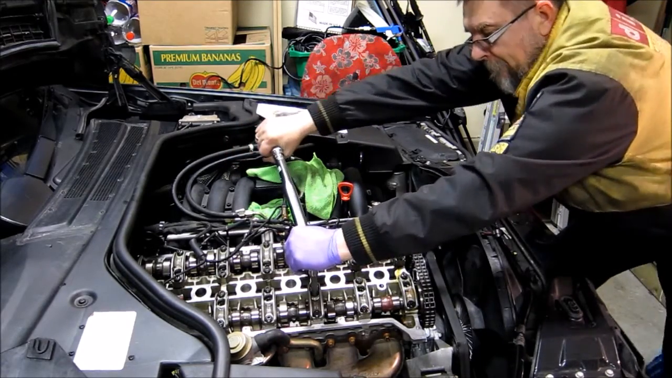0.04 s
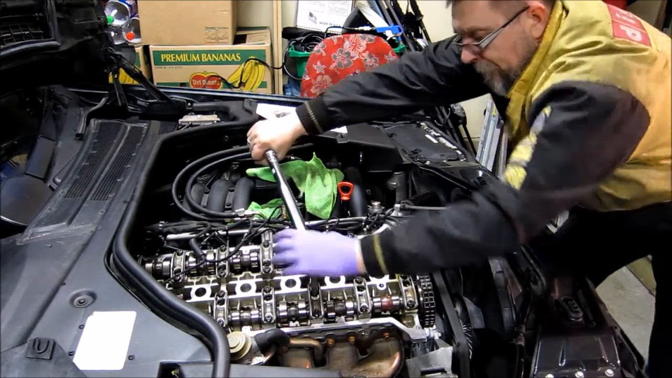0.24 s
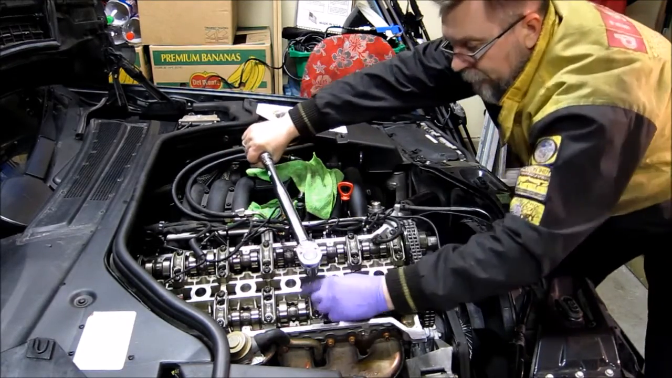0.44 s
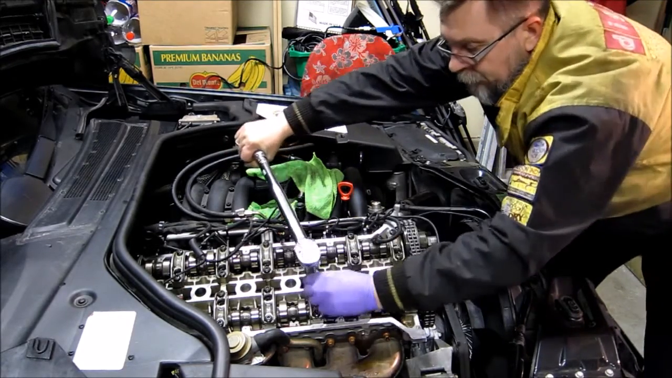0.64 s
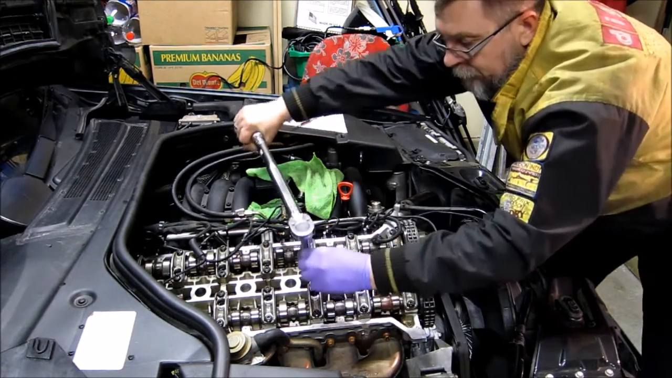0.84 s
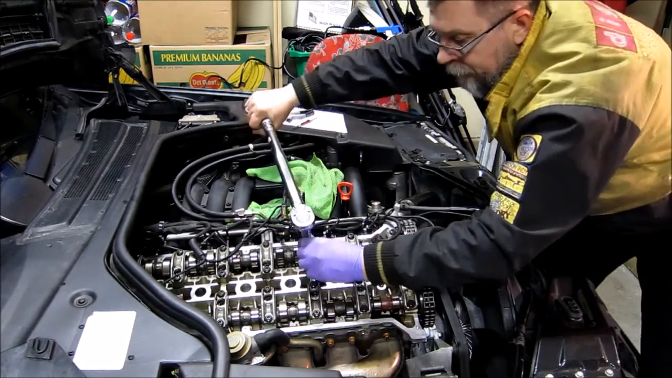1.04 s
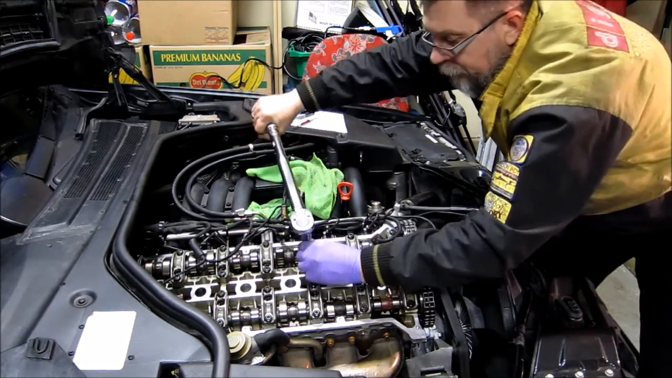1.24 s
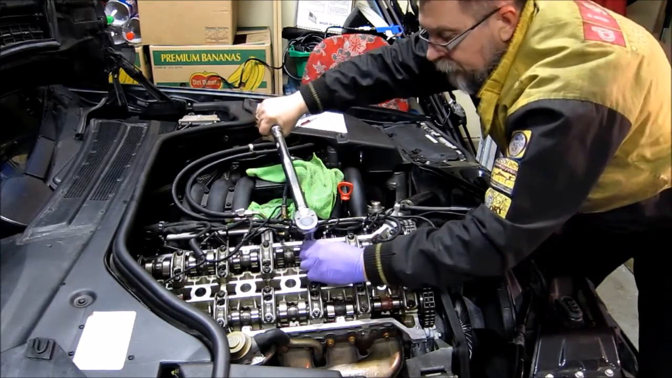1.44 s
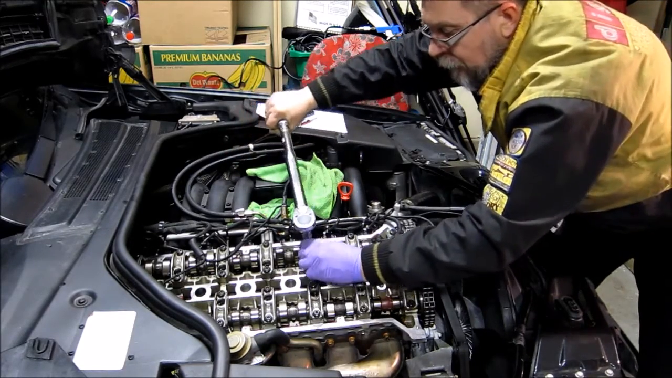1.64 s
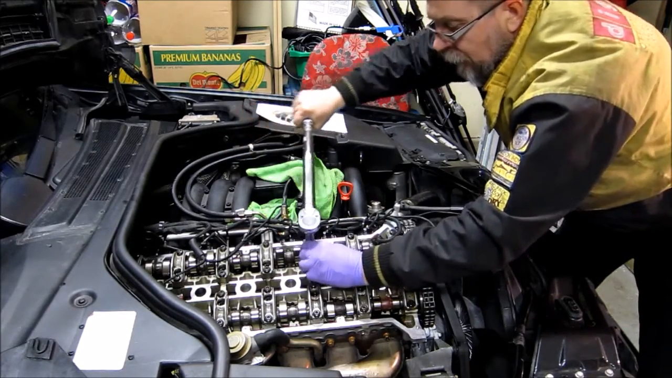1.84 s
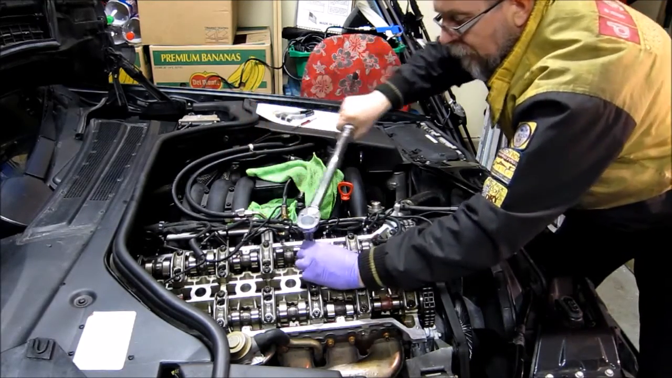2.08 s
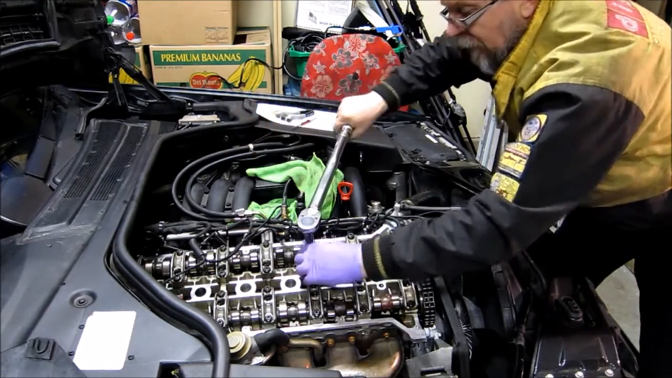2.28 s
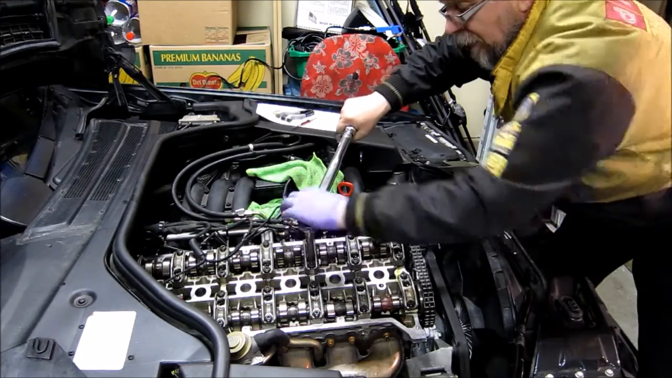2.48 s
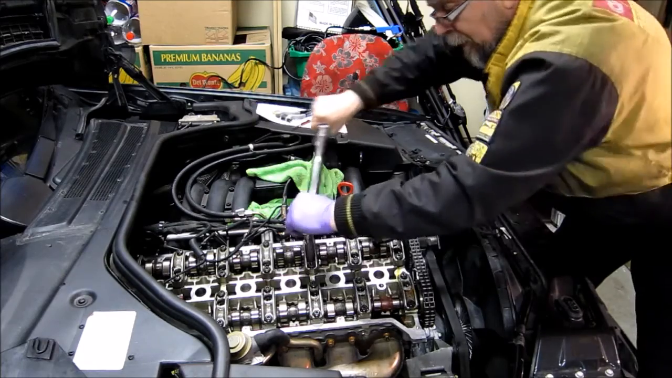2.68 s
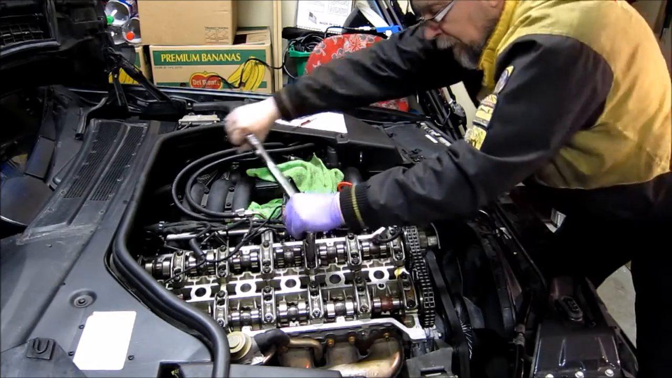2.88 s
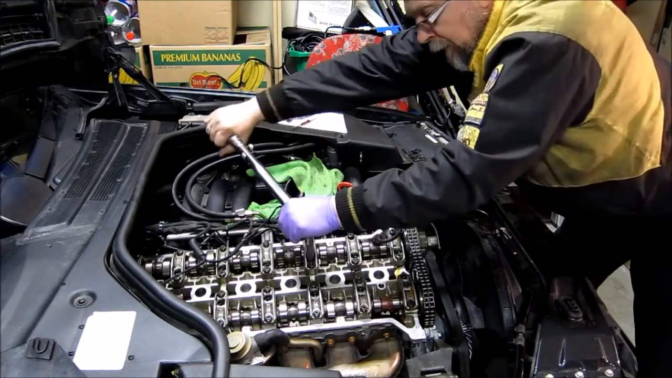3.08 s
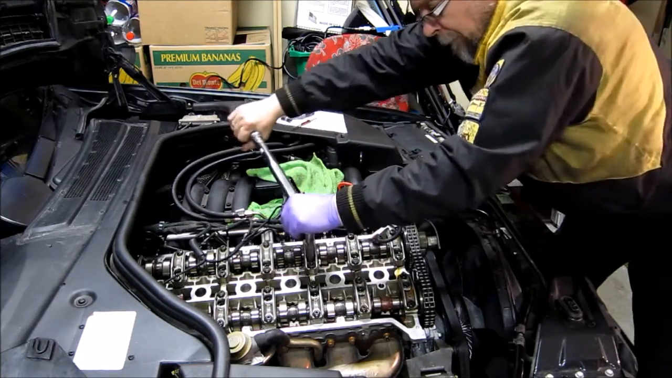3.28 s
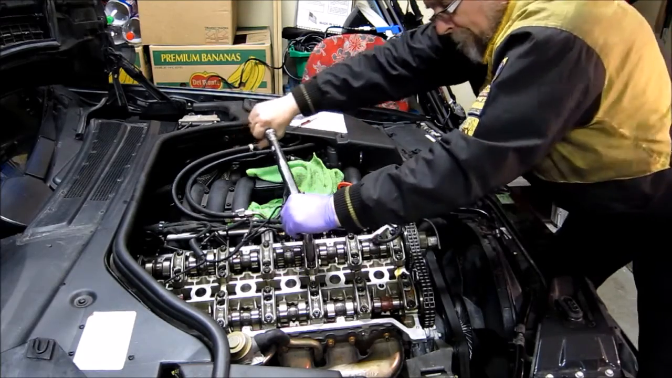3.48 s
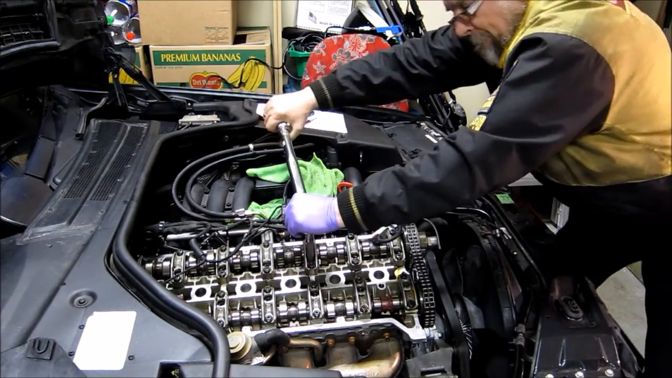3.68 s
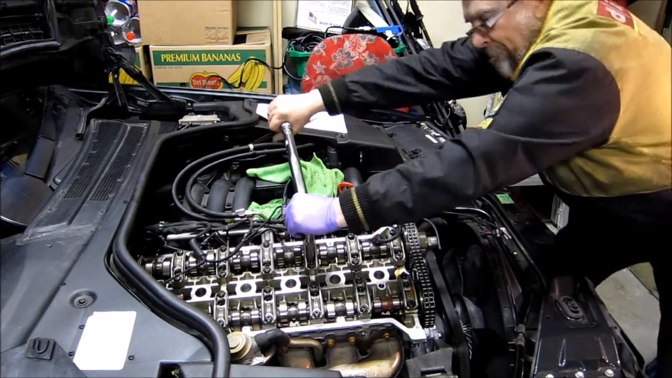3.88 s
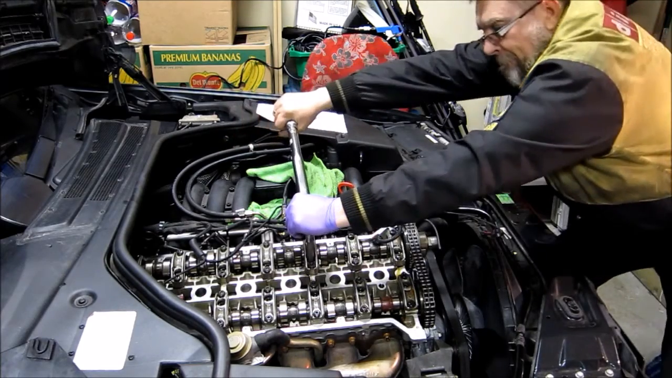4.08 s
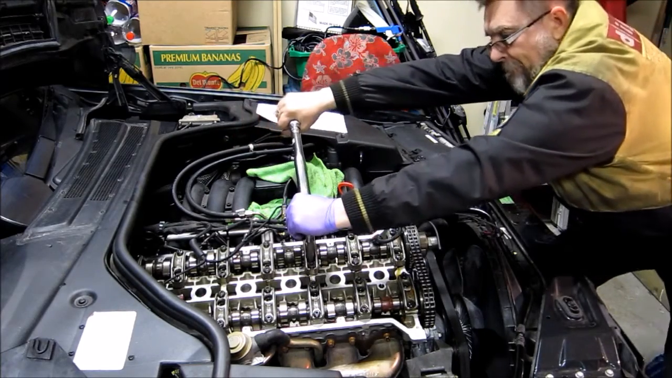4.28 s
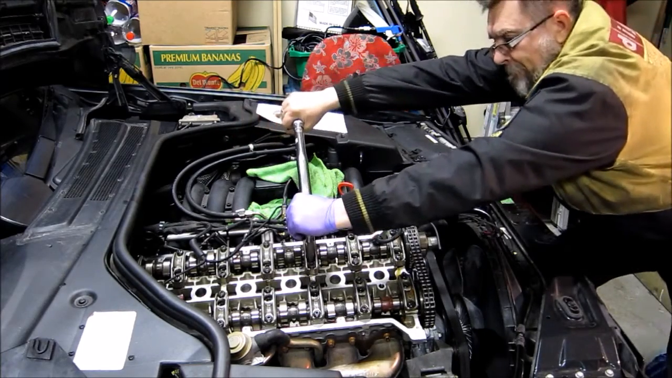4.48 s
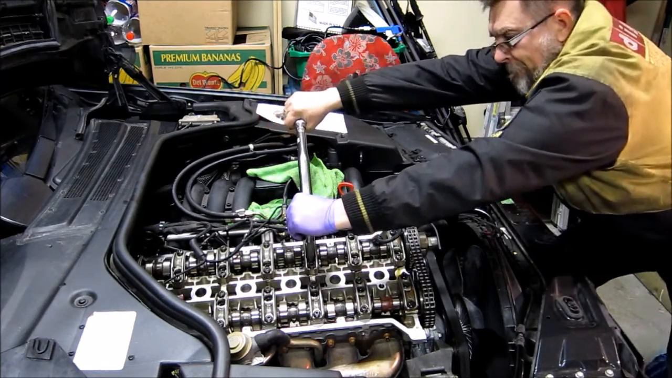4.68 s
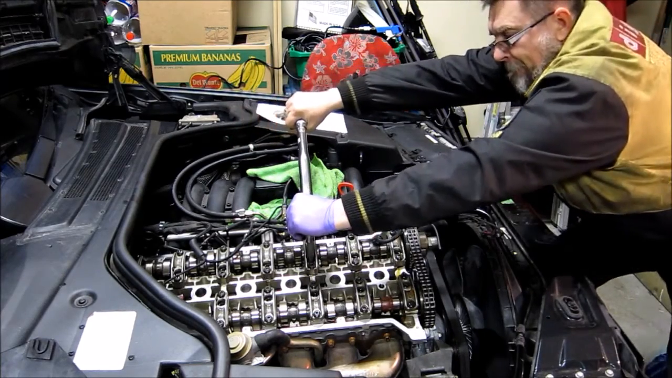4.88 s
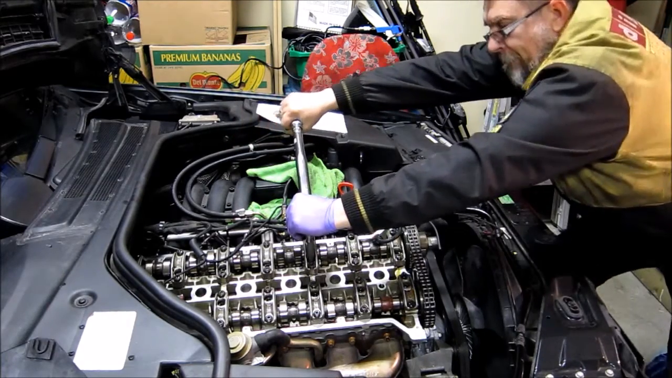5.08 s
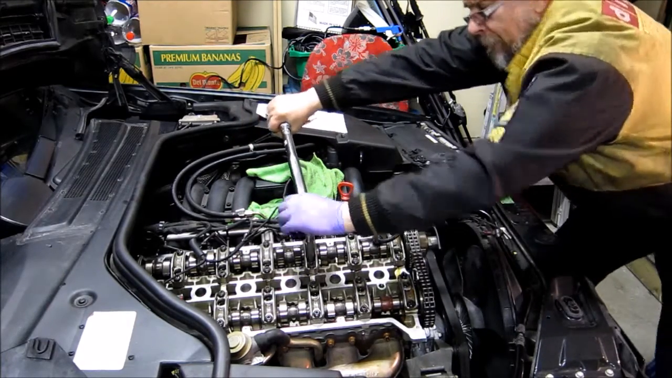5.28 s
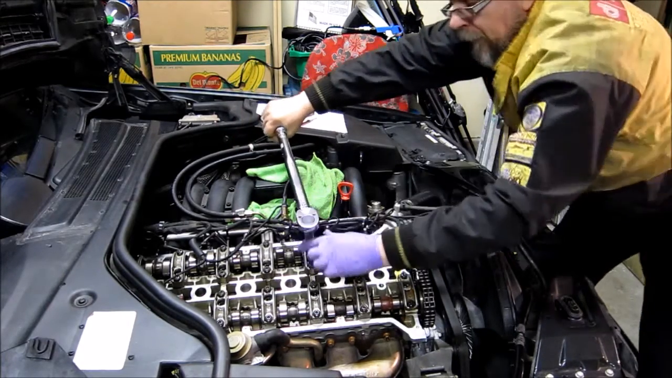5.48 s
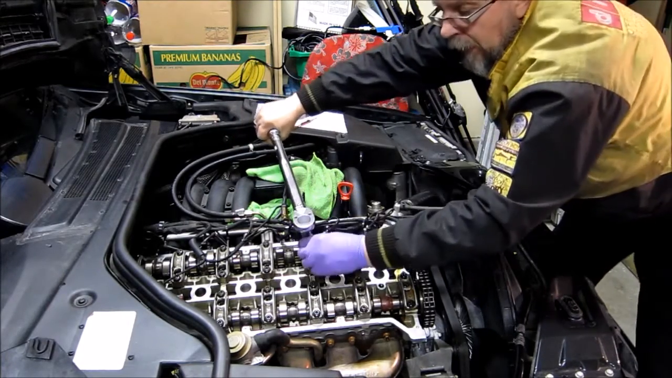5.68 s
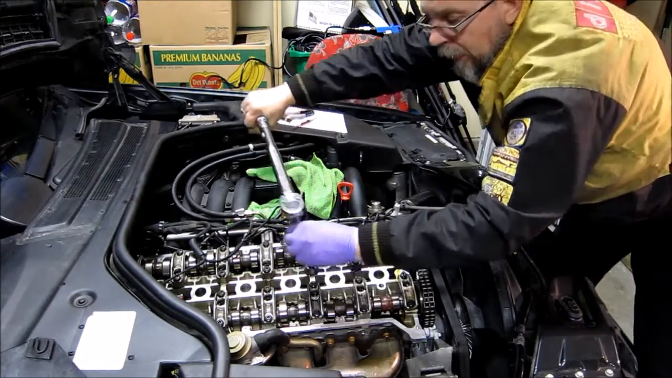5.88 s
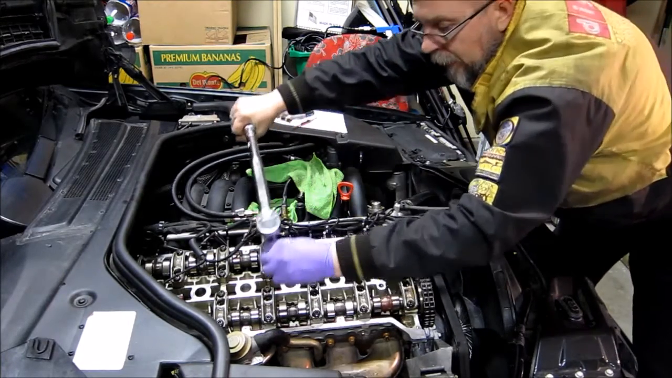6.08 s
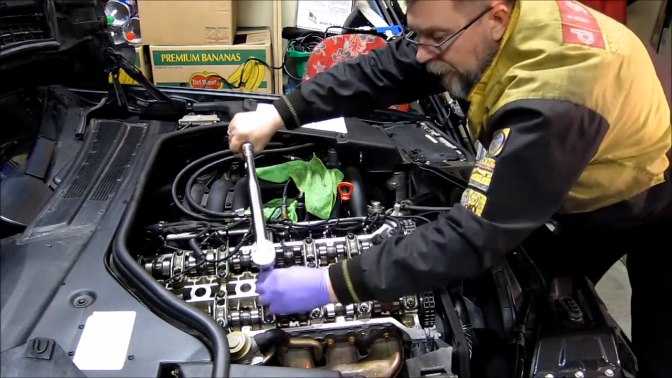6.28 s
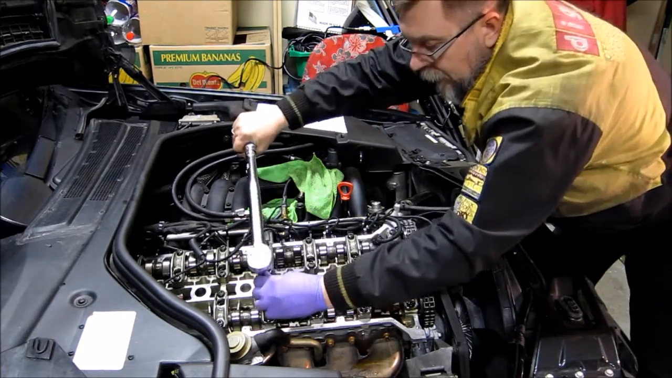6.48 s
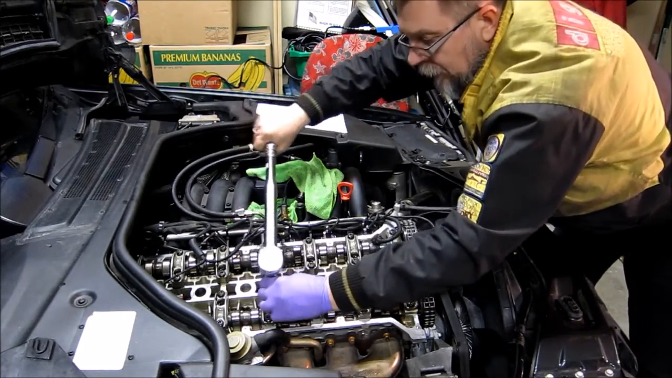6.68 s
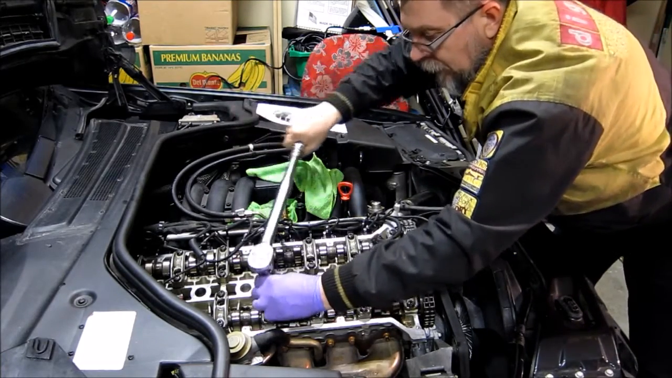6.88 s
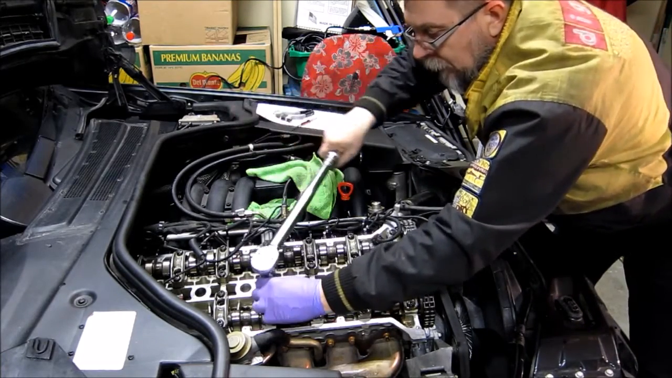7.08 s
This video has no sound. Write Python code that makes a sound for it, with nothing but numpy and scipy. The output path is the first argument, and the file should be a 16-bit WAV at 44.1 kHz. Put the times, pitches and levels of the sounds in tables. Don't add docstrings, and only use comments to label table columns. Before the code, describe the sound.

A small garage is heard from two metres, with a wavering machine hum, rushing air and low traffic rumble, initially subdued and swelling back. At 0.1 s a torque wrench snaps, hard and thin, with a brief steel ring. From 0.35 to 1.2 s the socket drags over metal, a gritty scrape growing firmer and squealing, with small ticks, ending in a firm clack at 1.2. Rattlier seating knocks come at 1.6 and 2.0, then sleeve rustles and ticks. Two snaps fall close together at 2.8 and 2.9. A quieter gap carries soft cloth rubbing and rumble swells around 3 to 4.5. The hardest, brightest snap cracks at 4.7, ringing; the background drops sharply and creeps back. Another snap follows at 5.2. Faint sliding and light ticks come at 5.6-5.9, then socket clacks at 6.4, 6.65 and 7.05, with short garage echo.

```python
import sys
import numpy as np
from scipy import signal
from scipy.fft import rfft, irfft
from scipy.io import wavfile
from scipy.ndimage import uniform_filter1d

SR = 44100
rng = np.random.default_rng(int(sys.argv[2]) if len(sys.argv) > 2 else 0)


def generate_wav(sig):
    pcm = np.round(np.clip(np.atleast_2d(sig).T, -1, 1) * 32767).astype(np.int16)
    wavfile.write(sys.argv[1], SR, pcm)


def amplitude_ratio(level_db):
    exponent = np.asarray(level_db, float) / 20
    return 10 ** exponent


N = 314874
KNOCK_SAMPLES, LEAD_SAMPLES = 4096, 256


def wrench(gain_db):
    out = np.zeros((2, N + SR))
    for start_s, level_db, *colour in knocks():
        i = int(start_s * SR) - 24
        first = i - LEAD_SAMPLES
        out[:, first:first + KNOCK_SAMPLES] += amplitude_ratio(level_db + 12 - gain_db[i]) * knock(*colour)
    ring_to_room_db = np.array([[0], [-5]])
    for start_s, pitch_hz, level_db, t60_s in rings():
        i = int(start_s * SR)
        ring = beating_ring(pitch_hz, t60_s)
        out[:, i:i + len(ring)] += amplitude_ratio(level_db - 5 - gain_db[i] + ring_to_room_db) * ring
    return out[:, :N]


# start_s, peak_db, upper_db (4.5-8 kHz), treble_db, rattle_ms
SNAPS = [
    (0.1129, -6.5, 1.5, -3, 1.27),
    (2.8248, -7.5, -4, -9, 1.96),
    (2.9193, -9.5, -13, -4, 2),
    (4.7176, -4.5, 5.5, 0, 0.75),
    (5.2108, -6.5, 2.5, -2, 0.85),
]
# start_s, peak_db, upper_db, treble_db, rattle_ms
SEATS = [
    (1.2148, -6, 1, -2, 1.54),
    (1.5838, -13.5, -1.5, -11, 3.2),
    (1.9903, -13.5, 6.5, 0, 1.05),
    (2.0026, -10, -3.5, -0.5, 1.9),
    (6.3618, -7.5, 4, -3.5, 1.36),
    (6.6468, -10, -3.5, -3.5, 2.1),
    (7.0608, -10, 5, -10.5, 0.57),
]
# start_s, peak_db, brightness_db, bass_db
TICKS = [(0.6565, -32, -4.5, -18), (0.788, -34.5, 3, -13), (1.6572, -25.5, -18.5, -17),
         (1.7567, -33.5, -3, -12), (1.7674, -39, -3, -14), (2.3519, -34.5, -11, -27),
         (2.5544, -32.5, -2, -3.5), (2.569, -36, 3.5, -16), (2.6854, -54.5, 16.5, -3),
         (2.7298, -40.5, -1.5, -14), (2.7714, -44.5, 5, -15), (3.7048, -40, -10.5, -2),
         (5.7949, -38.5, -1.5, -9), (5.8114, -34.5, -17, -20), (5.8462, -33, -15, -21),
         (5.861, -27, -9.5, -21.5), (5.8768, -35.5, -10.5, -5.5), (6.4782, -25, -9.5, -31.5),
         (6.819, -43, -24.5, -18), (6.994, -57, -22, -12)]
# start_s, peak_db, upper_db, treble_db, bass_db
TOUCHES = [(1.579, -18.5, -23, -0.5, -22), (1.982, -30, -6, -15.5, -27), (1.987, -22, -31, -27, -13),
           (2.008, -13, -7, -17, -12.5), (2.823, -24.5, 9, 7, -43), (2.913, -22.5, 11, -10, -39),
           (5.52, -63, 5.5, 1.5, -19), (5.802, -38.5, -5, -0.5, -23.5), (5.852, -37, -1, -15.5, -21),
           (6.345, -38, -7, -17, -14), (6.596, -42, -7, -19.5, -25), (6.619, -50.5, -15.5, -37.5, -10),
           (7.054, -20.5, 3, -7.5, -41), (7.069, -16.5, -23, -9, -22.5)]
SNAP_BASS_DB, SEAT_BASS_DB = -33, -23
TICK_TREBLE_DB, TICK_RATTLE_MS = -6, 2.6
TOUCH_RATTLE_MS = 3.3


def knocks():
    rows = []
    for table, bass_db in ((SNAPS, SNAP_BASS_DB), (SEATS, SEAT_BASS_DB)):
        rows += [(*row[:4], bass_db, row[4]) for row in table]
    for start_s, peak_db, bright_db, bass_db in TICKS:
        rows.append((start_s, peak_db, bright_db, bright_db + TICK_TREBLE_DB, bass_db, TICK_RATTLE_MS))
    rows += [(*row, TOUCH_RATTLE_MS) for row in TOUCHES]
    return sorted(rows)


# pitch_hz, level_db, t60_s
STEEL_MODES = [(1193, -10, 0.2), (1643, -5, 0.11), (2050, -20.5, 0.026), (2360, -17.5, 0.1),
               (2650, -5, 0.22), (3316, 5.5, 0.069), (3510, -7, 0.035), (4330, 0, 0.12), (4680, -3, 0.14),
               (5200, -16.5, 0.033), (5050, -16.5, 0.067), (6100, -10, 0.079), (6850, -8, 0.029),
               (10300, -16.5, .03), (9850, -0.5, 0.022), (12400, -2.5, 0.015), (10600, -10.5, 0.022),
               (12600, -16, 0.017)]
# frequency_hz, level_db
CRACK = [(60, -30), (250, -17), (700, -2), (1200, -9), (1700, -6.5), (2500, -0.5), (4000, -0.5), (5500, -4),
         (7500, -2.5), (10500, 2), (13000, -9), (15500, -14.5), (17500, -58)]
BAND_EDGES_HZ = (1150, 4500, 8200)


def knock(upper_db, treble_db, bass_db, rattle_ms):
    t = np.arange(KNOCK_SAMPLES) / SR
    hz = np.fft.rfftfreq(KNOCK_SAMPLES, 1 / SR)
    since = np.maximum(t - LEAD_SAMPLES / SR, 0)
    contacts = rng.standard_normal(KNOCK_SAMPLES) * amplitude_ratio(4 * rng.standard_normal(KNOCK_SAMPLES))
    rattle = (1 - np.exp(-since / 0.0017)) ** 2 * np.exp(-1000 * since / max(rattle_ms, 0.3))
    contacts = rfft(contacts * rattle)

    strike, shift = rng.standard_normal((2, len(STEEL_MODES), 1))
    mode_hz, mode_db, t60_s = np.transpose(STEEL_MODES)[:, :, None]
    ringing = amplitude_ratio(mode_db + 3 * strike) * fading(t, mode_hz * (1 + 0.02 * shift), t60_s)
    modes = rfft(np.sum(ringing, axis=0))
    crack = amplitude_ratio(along_hz(CRACK, hz))
    steel_db = -11
    body = crack + amplitude_ratio(steel_db) * modes * np.linalg.norm(crack) / np.linalg.norm(modes)

    power = np.abs(contacts) ** 2
    front = contacts / np.sqrt(uniform_filter1d(power, size=48))
    around = contacts / np.sqrt(uniform_filter1d(power, size=8))

    lowpasses = [1 / (1 + (hz / edge) ** 8) for edge in BAND_EDGES_HZ]
    bands = np.diff([0 * hz, *lowpasses, 1 + 0 * hz], axis=0)
    levels_db = (bass_db + 3.5, 0, upper_db, treble_db)
    weights = sum(amplitude_ratio(db) * b / np.linalg.norm(b * crack) for db, b in zip(levels_db, bands))
    both = irfft(np.array([front * body, around * crack]) * weights)
    onset = 1 - np.exp(-since / 0.0006)
    return both * onset * signal.windows.tukey(KNOCK_SAMPLES, 0.1) * np.sqrt(KNOCK_SAMPLES / 2)


# start_s, pitch_hz, level_db, t60_s
SHAFT_RINGS = [(0.115, 6090, -53, 0.62), (1.215, 2820, -32, 0.18), (1.216, 2240, -34.5, 0.36),
               (1.217, 4130, -45.5, 0.5), (4.718, 4160, -30, 0.27), (4.718, 2236, -24.5, 0.1),
               (4.718, 6080, -52, 0.81), (5.210, 1723, -42, 0.25), (5.211, 2251, -32, 0.32),
               (5.797, 3330, -46.5, 0.13), (6.647, 2842, -24, 0.099)]
# start_s, pitch_hz, level_db
PINGS = [(.114, 2400, -14), (.657, 6770, -37.5), (1.584, 5200, -24), (1.988, 3364, -17), (1.990, 6850, -13),
         (2.003, 10800, -20), (2.005, 4050, -13), (2.353, 2950, -40), (2.825, 2750, -19),
         (2.919, 5220, -14), (4.717, 6690, -6), (5.210, 2255, -19), (6.362, 3565, -15), (6.365, 2930, -17),
         (6.481, 4200, -35), (6.481, 2810, -35), (6.618, 2570, -35), (6.647, 10600, -24),
         (6.820, 2710, -43), (7.060, 6600, -14), (7.061, 11500, -15), (7.070, 10600, -22)]
PING_T60_S = 0.027
# pitch_hz, t60_s
HEAD_MODES = [(315, .12), (720, 0.083)]
# start_s, low_mode_db, high_mode_db
THUDS = [
    (.114, -48, -45),
    (4.718, -40, -50),
    (5.21, -46, -43),
    (6.362, -50, -35),
]


def rings():
    rows = SHAFT_RINGS + [(*row, PING_T60_S) for row in PINGS]
    for start_s, *levels_db in THUDS:
        rows += [(start_s, hz, db, t60_s) for db, (hz, t60_s) in zip(levels_db, HEAD_MODES)]
    return rows


def beating_ring(pitch_hz, t60_s):
    t = np.arange(int(min(t60_s, 1) * SR)) / SR
    splits = rng.standard_normal((6, 1))
    spread_hz = 0.007 * pitch_hz + 6 / t60_s
    modes = fading(t, pitch_hz + spread_hz * (splits - splits.mean()), t60_s)
    return np.sum(modes, axis=0) * (1 - np.exp(-t / 0.0006))


# centre_hz, width_hz, level_db
SCRAPE_BODY = [(332, 42, -2.5), (1302, 62, 3), (1530, 85, -11), (1670, 160, 8), (1770, 97, 2),
               (2160, 76, -2), (2420, 57, -27), (2905, 68, -21), (3135, 300, -21)]
SQUEAL_HZ, SQUEAL_WIDTH_HZ = 2740, 58
FIRM_DB = -45
SQUEAL_DB, SQUEAL_GROWTH = -7, 2.36
BRIGHT_DB, BRIGHT_GROWTH = -9.5, -1.4


def scrape(gain_db):
    unrest_db = np.array([1.5 * walk(60), 3.2 * walk(70), 1.5 * walk(30), 2.5 * walk(60)])
    slips = rng.standard_normal((4, N)) * amplitude_ratio(unrest_db)
    body = 0
    for hz, width_hz, level_db in SCRAPE_BODY:
        body = body + amplitude_ratio(level_db + 1.2 * walk(12)) * band(hz, width_hz, slips[0])
    press = pressure_db() - FIRM_DB
    squeal = amplitude_ratio(SQUEAL_DB + SQUEAL_GROWTH * press) * band(SQUEAL_HZ, SQUEAL_WIDTH_HZ, slips[1])
    bright = amplitude_ratio(BRIGHT_DB + BRIGHT_GROWTH * np.maximum(press, -8))
    bright = bright * band(3900, 700, band(4600, 1200, slips[2]))
    cloth = strokes() * band(3600, 4500, band(4000, 6200, slips[3]))
    steel = amplitude_ratio(FIRM_DB + press) * (rms1(body) + squeal + bright)
    return amplitude_ratio(-7 - gain_db) * (steel + cloth)


# time_s, pressure_db
SCRAPE = [
    (0.33, -76),
    (0.36, -50.5),
    (0.53, -51.5),
    (0.572, -55),
    (0.6, -46.5),
    (0.778, -44.5),
    (0.918, -41.5),
    (1.184, -42),
    (1.21, -48),
]
# time_s, pressure_db
SLIDE = [
    (5.555, -72),
    (5.572, -61.5),
    (5.64, -72),
    (5.79, -66.5),
    (5.8, -70),
]


def pressure_db():
    t = np.arange(N) / SR
    heavy, light = (np.interp(t, *np.transpose(rows), -120, -120) for rows in (SCRAPE, SLIDE))
    return np.maximum(heavy, light)


# start_s, length_s, level_db
RUSTLE = [(1.38, 0.51, -54.5), (2.15, .19, -49), (2.38, .1, -54.5), (2.555, .04, -46), (2.693, 0.035, -45),
          (2.74, .07, -53.5), (3.7, .32, -54.5), (4.04, .03, -52), (4.15, .3, -63.5), (4.557, .012, -59),
          (5.563, .012, -65)]
STROKE_ATTACK_S, STROKE_RELEASE_S = 0.006, 0.03


def strokes():
    start_s, length_s, level_db = np.transpose(RUSTLE)[:, :, None]
    since = np.arange(N) / SR - start_s
    rise = np.clip(since / STROKE_ATTACK_S, 0, 1)
    fall = np.exp(-np.maximum(since - length_s, 0) / STROKE_RELEASE_S)
    return np.sum(amplitude_ratio(level_db) * rise * fall, axis=0)


# frequency_hz, t60_s
ROOM_T60 = [(100, 0.53), (1000, 0.42), (3000, 0.34), (6000, 0.3), (11000, 0.27), (16000, 0.081)]
ROOM_DB = -6.5
BAY_DB, BAY_T60_S = -6, 0.09


def garage(dry):
    t = np.arange(SR // 2) / SR
    noise = pair(lambda hz: along_hz(ALIKE, hz), size=len(t))
    room = 0
    for centre_hz in 60 * 2 ** np.arange(0, 8.5, 0.5):
        part = shape(noise, lambda hz: np.clip(1 - 2 * np.abs(np.log2((hz + 1) / centre_hz)), 0, 1))
        room = room + part * np.exp(-np.log(1000) * t / along_hz(ROOM_T60, centre_hz))
    room = room * (1 - np.exp(-t / 0.0081))
    bay = pair(lambda hz: 0.5 + 0 * hz, size=len(t)) * np.exp(-np.log(1000) * t / BAY_T60_S)
    echo = amplitude_ratio(ROOM_DB) * room / np.sqrt(np.sum(room ** 2) / 2)
    echo = echo + amplitude_ratio(BAY_DB) * bay / np.sqrt(np.sum(bay ** 2) / 2)
    return dry[0] + signal.fftconvolve(dry[1:], echo, axes=1)[:, :N]


# pitch_hz, rms_db
HUM = [(214.4, -61), (253, -70.5), (294, -66), (428.8, -54.5), (548.2, -58.5), (643.3, -70), (722.6, -62.5),
       (857.6, -57), (1072, -72.5), (1271, -64), (1486, -63.5), (1636, -67), (1714, -63), (1995, -81.5),
       (2573, -70), (3122, -71), (8802, -68)]
# frequency_hz, level_db (per Hz)
AIR = [(15, -30.5), (30, 3), (70, 0), (200, -5.5), (500, -8), (1000, -10.5), (1700, -7), (2400, -13.5),
       (3200, -12.5), (5000, -17.5), (7000, -28), (9000, -48.5)]
# frequency_hz, likeness (1 same, -1 opposite)
ALIKE = [(60, 0.71), (640, 0.99), (1400, .3), (3000, 0.33), (6500, -0.64), (10000, -1.1)]
AIR_DB, HISS_DB = -49.5, -62.5


def machine():
    t = np.arange(N) / SR
    hum = np.zeros((2, N))
    for pitch_hz, level_db in HUM:
        drift = np.cumsum(walk(6)) * 2.6 / SR
        lean_db = 2.1 * rng.standard_normal() + (-6 if pitch_hz > 8000 else 0)
        sway = amplitude_ratio(1.1 * walk(5))
        right_phase = 0.64 * rng.standard_normal()
        phase = 2 * np.pi * pitch_hz * t + drift + np.array([[0], [right_phase]])
        hum += amplitude_ratio(level_db + np.array([[lean_db], [-lean_db]])) * sway * 2 ** 0.5 * np.sin(phase)
    air = shape(pair(lambda hz: along_hz(ALIKE, hz), size=N), lambda hz: amplitude_ratio(along_hz(AIR, hz)))
    hiss = shape(rng.standard_normal((2, N)), lambda hz: np.abs(resonance(hz, 9600, 4700)))
    return hum + amplitude_ratio(AIR_DB + 0.23 * walk(6.7)) * rms1(air) + amplitude_ratio(HISS_DB) * rms1(hiss)


# middle_s, half_length_s, low_db (near 95 Hz), high_db (near 145 Hz)
SWELLS = [(0.382, 0.054, -61.5, -68), (0.55, 0.033, -80, -56.5), (1.056, .08, -64.5, -61),
          (1.99, 0.037, -70, -57), (2.682, 0.11, -69, -65), (3.027, 0.068, -54.5, -58.5),
          (3.31, 0.13, -74, -60), (3.848, 0.11, -57, -69), (3.96, 0.059, -54, -55),
          (4.143, 0.098, -53, -79), (4.32, 0.052, -52, -76), (4.572, 0.12, -52, -81),
          (7.085, 0.062, -56, -59)]
DRONE_LOW_DB, DRONE_HIGH_DB, DRONE_SWAY_DB = -60.5, -58.5, 2


def rumble(gain_db):
    noise = pair(lambda hz: 0.75 + 0 * hz, size=N)
    middle_s, half_s, low_db, high_db = np.transpose(SWELLS)[:, :, None]
    bell = np.exp(-((np.arange(N) / SR - middle_s) / half_s) ** 2)

    def level(drone_db, swell_db):
        swell = np.sum(amplitude_ratio(swell_db) * bell, axis=0) / amplitude_ratio(gain_db)
        return amplitude_ratio(drone_db + DRONE_SWAY_DB * walk(2.6)) + swell

    low = level(DRONE_LOW_DB, low_db) * even(band(94, 6.9, noise))
    high = level(DRONE_HIGH_DB, high_db) * even(band(120, 50, band(143, 60, noise)))
    return low + high


# frequency_hz, left_db, right_db
PORT = [(20, -0.8, -1.9), (6900, 2.5, 2.5), (7460, 0, 0), (8740, -4, -1.5), (11460, -3, 2.5),
        (16000, -7.5, -1.5)]
NOTCH_HZ, NOTCH_WIDTH_HZ, NOTCH_DEPTH = 8250, 800, 0.77
RIGHT_LEAD_S = 1.2e-5


def ports(hz):
    notch = (1 - NOTCH_DEPTH * resonance(hz, NOTCH_HZ, NOTCH_WIDTH_HZ)) ** 3
    lead = np.exp(2j * np.pi * hz * RIGHT_LEAD_S)
    left, right = amplitude_ratio(along_hz(PORT, hz, column=1)), amplitude_ratio(along_hz(PORT, hz, column=2))
    return notch * np.array([left, right * lead])


# start_s, depth_db (negative lifts), hold_s
DUCKS = [(-0.2, 15.5, 0.35), (0.106, 4.5, 0.14), (1.254, 0.2, .05), (1.572, 2, 0.13), (2.03, 1.5, .06),
         (2.907, -0.7, 0.085), (4.702, 15.5, 0.67), (5.2, 3.5, .06), (6.351, 5.5, .04), (6.66, 0.5, 0.064),
         (7.057, 6, .05)]
OPEN_GAIN_DB, DUCK_ATTACK_S, DUCK_RELEASE_S = -0.5, 0.02, 0.63


def camera_gain_db():
    start_s, depth_db, hold_s = np.transpose(DUCKS)[:, :, None]
    since = np.maximum(np.arange(N) / SR - start_s, 0)
    fall = 1 - np.exp(-since / DUCK_ATTACK_S)
    recovery = np.exp(-np.maximum(since - hold_s, 0) / DUCK_RELEASE_S)
    return OPEN_GAIN_DB - np.sum(depth_db * fall * recovery, axis=0)


def fading(t, hz, t60_s):
    return np.exp(-np.log(1000) * t / t60_s) * np.sin(2 * np.pi * hz * t)


def resonance(hz, centre_hz, width_hz):
    return 1 / (1 + 1j * (hz ** 2 - centre_hz ** 2) / (hz * width_hz + 1))


def band(centre_hz, width_hz, x):
    return rms1(shape(x, lambda hz: resonance(hz, centre_hz, width_hz)))


def rms1(x):
    return x / np.sqrt(np.mean(x ** 2))


def even(x):
    return x / np.sqrt(uniform_filter1d(np.mean(x ** 2, axis=0), size=SR // 6))


def along_hz(table, hz, column=1):
    rows = np.array(table, float)
    return np.interp(np.log(hz + 1), np.log(rows[:, 0]), rows[:, column])


def shape(x, gain):
    return irfft(rfft(x) * gain(np.fft.rfftfreq(x.shape[-1], 1 / SR)), x.shape[-1])


def walk(rate_hz):
    k = int(SR / rate_hz)
    held = np.repeat(rng.standard_normal(N // k + 1), k)
    return 1.3 * uniform_filter1d(uniform_filter1d(held, k), k)[:N]


def pair(alike, size):
    mid, side = rng.standard_normal((2, size))
    mid = shape(mid, lambda hz: np.sqrt(1 + np.clip(alike(hz), -1, 1)))
    side = shape(side, lambda hz: np.sqrt(1 - np.clip(alike(hz), -1, 1)))
    return np.array([mid + side, mid - side]) / 2


def scene():
    gain_db = camera_gain_db()
    return garage(wrench(gain_db) + scrape(gain_db)) + machine() + rumble(gain_db)


def roll_off(x):
    return signal.sosfilt(signal.butter(12, 21850, fs=SR, output="sos"), x)


def record(dry):
    heard = shape(dry, ports) * amplitude_ratio(camera_gain_db())
    return roll_off(np.clip(heard, -1, 1))


dry = scene()
out = record(dry)
generate_wav(out)
```